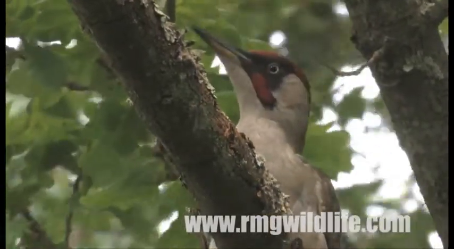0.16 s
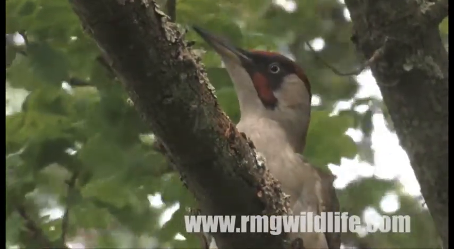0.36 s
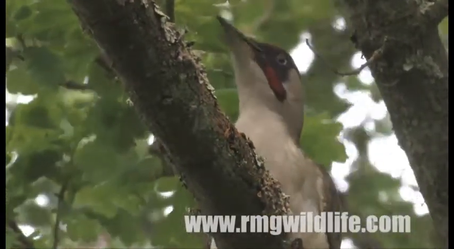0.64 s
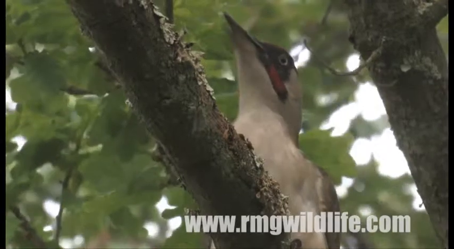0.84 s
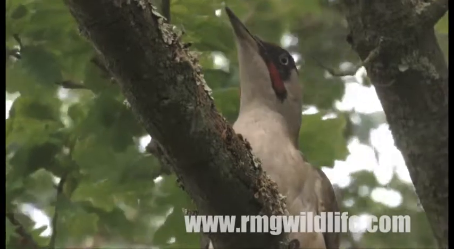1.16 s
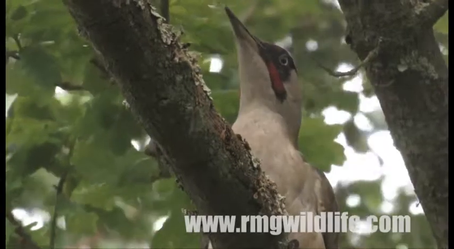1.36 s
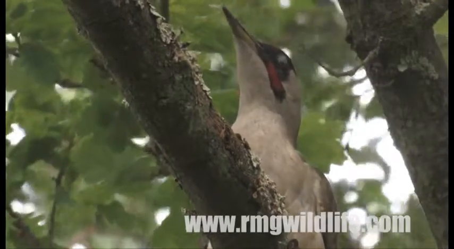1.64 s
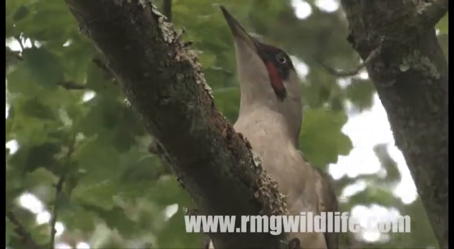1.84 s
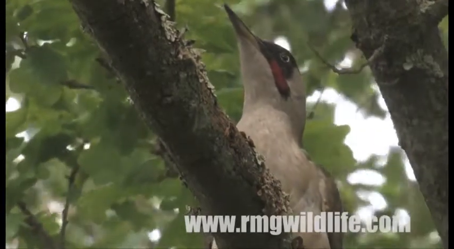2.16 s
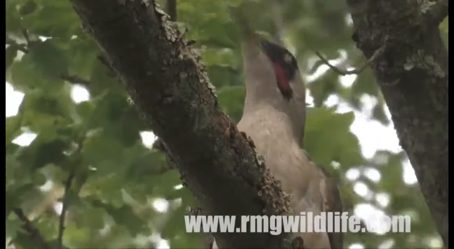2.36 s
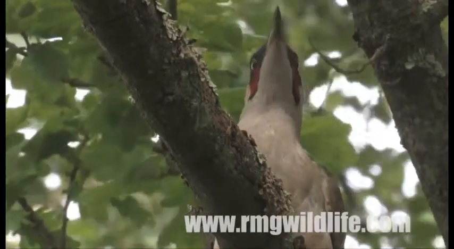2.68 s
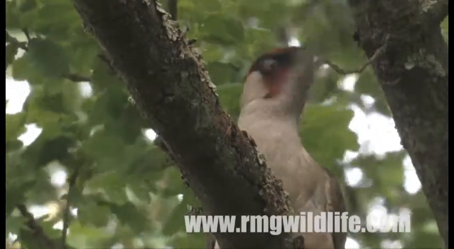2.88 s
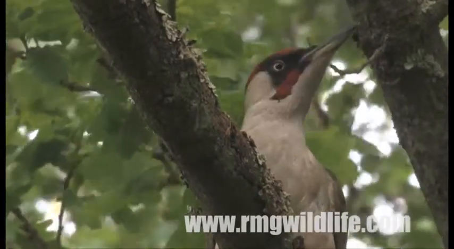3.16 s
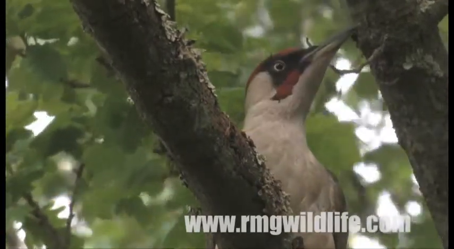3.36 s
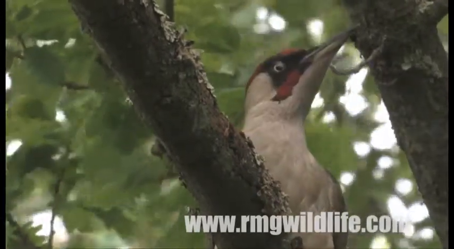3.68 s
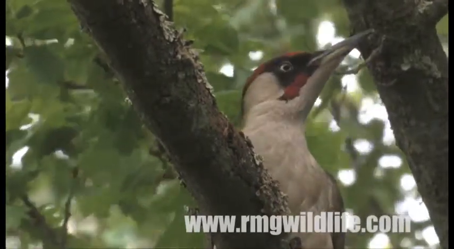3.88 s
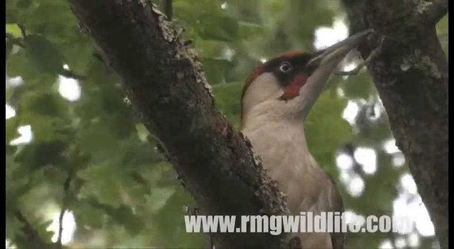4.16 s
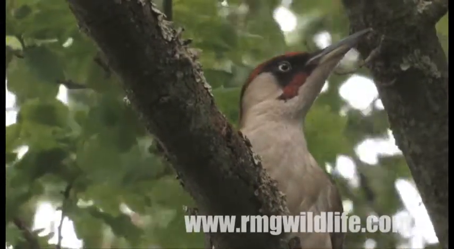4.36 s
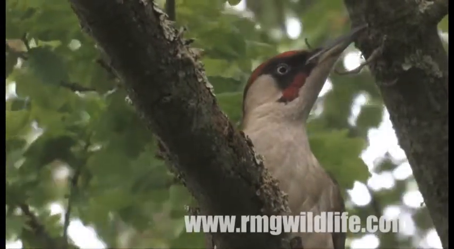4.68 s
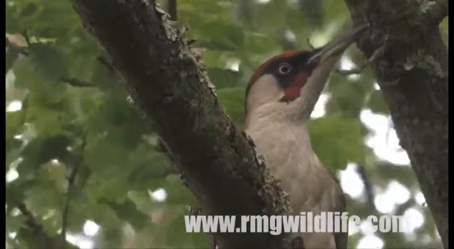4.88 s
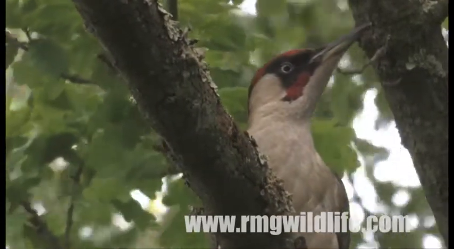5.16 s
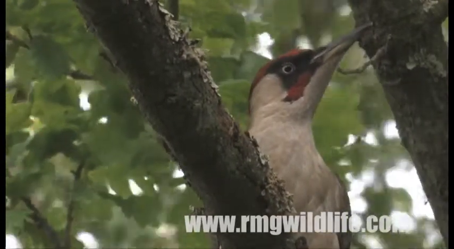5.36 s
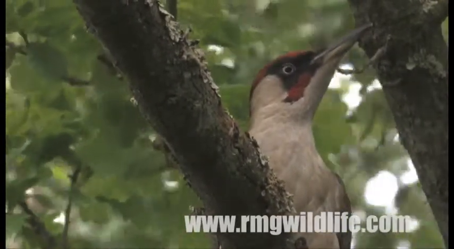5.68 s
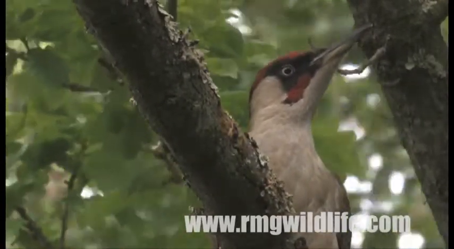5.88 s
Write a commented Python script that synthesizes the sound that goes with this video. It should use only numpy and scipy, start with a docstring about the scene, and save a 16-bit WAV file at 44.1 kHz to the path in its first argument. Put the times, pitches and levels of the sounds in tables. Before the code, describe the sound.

A low, steady woodland hush runs throughout, with very faint high leaf rustle that strengthens a little after 4 seconds. A woodpecker, fairly close and central, gives ten very short, sharp calls, about a tenth of a second or less each, arching up and dropping at the end, with a brief woody echo. A clear yelp comes at 0.15, then three harsh, hoarse squawks at 0.6, 0.75 and 0.9, and clear cracking yelps at 1.2 and 2.0. Far away, a small bird whistles thinly at 2.3, runs a rapid faint trill from 2.4 to 2.9, and adds a rising peep at 3.0. Another yelp follows at 3.3. Soft dull bumps with a light tick sound near the microphone at 3.65. Reedy, nasal calls come at 3.95 and 4.4, with a faint low thump at 4.2 between them. After a pause, a last, softer reedy call sounds at 5.85, then small bumps at 5.97.

```python
"""A green woodpecker on a branch gives ten short, sharp calls, clear, harsh or reedy, as stacks of harmonics.
Each is an arch of pitch that drops at its end; trunks and leaves throw it back as decaying scatter.
A small bird twitters far off in gliding sine tones, and leaves stir over a low steady hush, both of shaped noise.
Close to the microphone come a few soft bumps: damped sines, with one tick of noise."""
import sys
import numpy as np
from scipy import signal
from scipy.fft import rfft, irfft
from scipy.io import wavfile
from scipy.ndimage import uniform_filter1d

SR = 44100
rng = np.random.default_rng(int(sys.argv[2]) if len(sys.argv) > 2 else 0)


def bounce(signal):
    """Save signal as a 16-bit WAV file at the path given by the first command-line argument."""
    frames = np.transpose(np.atleast_2d(signal))
    limited = np.clip(frames, -1, 1)
    pcm = np.round(limited * 32767).astype(np.int16)
    wavfile.write(sys.argv[1], SR, pcm)


N = 266011

# steady hush of the place, shape only: (frequency [Hz], relative density [dB per Hz])
HUSH_SPECTRUM = [(15, -56), (25, 3), (59, -9), (119, -7), (152, -3.5), (305, -3.5), (469, -3), (509, -5.5),
                 (648, -9), (703, -8.5), (895, -11.5), (1750, -18.5), (2230, -20), (3260, -23),
                 (15500, -28)]
# stirring leaves, shape only: (frequency [Hz], relative density [dB per Hz])
LEAF_SPECTRUM = [(2000, -14), (4000, -10.5), (6500, -5.5), (8000, -9), (10000, -19), (15000, -35)]
# leaves as the breeze moves them: (time [s], level [dB])
LEAF_LEVEL = [(0, -77.5), (1.6, -78.5), (2.6, -76.5), (3.6, -76), (4.6, -73), (5.1, -72.5), (5.6, -72),
              (6.03, -73)]
# likeness of left and right in the hush and leaves: (frequency [Hz], correlation [-1 to 1])
STEREO_LIKENESS = [(60, 0.95), (150, 0.98), (380, 0.99), (950, 0.98), (2380, 0.96), (5980, 0.83),
                   (15000, 0.36)]
# the woodpecker's throat and open beak: (frequency [Hz], gain [dB])
THROAT = [(600, -5), (1200, -10.5), (1700, 2.5), (2300, 1.5), (2900, -1.2), (3600, -2), (4400, -0.5),
          (5200, -2), (6300, -1), (7500, -16.5), (9000, -18), (11000, -26), (14000, -40)]
# clear calls that crack: (top of the arch [s], climb [s], hold until the crack [s], drop [s], top pitch [Hz],
#   arch width [s], pitch after the crack [Hz], scoop level [dB], level [dB], late swell [dB],
#   level after the crack [dB], overtones [dB], undertone [dB], straight treble [dB], echo [dB],
#   beak resonance [dB], creak [radians]); call levels here and below are before throat and woodpecker gain
YELPS = [(0.162, .0145, 0.04, .028, 2660, 0.024, 2550, -59.5, -35.5, 1, -44.5, 2.5, -41, -3, 1.5, 4, 0.031),
         (1.177, .009, .0315, 0.026, 2174, 0.039, 2595, -58.5, -41, 6.5, -44, 3.5, -19.5, -5, 1, -2, 0.14),
         (1.976, 0.011, .027, 0.024, 2152, 0.033, 2424, -55, -43.5, 6, -44.5, 2.5, -22, -5, 1.5, -4.5, 0.45),
         (3.268, 0.0095, 0.026, 0.02, 2283, 0.024, 2350, -52.5, -43, 6, -47.5, 1, -17, -5.5, 1.5, 3, 0.18)]
# harsh calls: (top of the arch [s], rise [s], fall [s], top pitch [Hz], level [dB], burst before the top [s],
#   burst [dB], pitch jump as the burst breaks [share], roughness [0-1], straight treble [dB], echo [dB],
#   beak resonance [dB], creak [radians])
SQUAWKS = [(0.597, 0.042, 0.036, 3004, -50.5, 0.02, 18, 0.016, .42, -7, 3.1, 7.5, 0.056),
           (0.735, 0.036, 0.034, 3004, -49, 0.019, 14.5, .17, 0.49, -6, 4.2, 9.7, .027),
           (0.916, .030, 0.027, 2881, -49, 0.0136, 14.9, 0.0615, 0.62, -6.5, 4.1, 10.6, 0.075)]
# reedy, period-doubled calls: (top of the arch [s], climb [s], hold [s], drop [s], top pitch [Hz], level [dB],
#   fade while held [dB], overtones [dB], undertone [dB], late undertone [dB], late roughness [0-1],
#   straight treble [dB], echo [dB], beak resonance [dB], creak [radians])
CHUCKS = [(3.961, .013, 0.035, 0.023, 3278, -41.5, 8.5, -2, -3, 15.5, 0.33, -4, 1, -2.5, .03),
          (4.388, 0.013, 0.038, .015, 3220, -40.5, 9.5, -1.5, -2.5, 5.5, 0.15, -2.5, 1.5, -1, .03),
          (5.860, .010, .020, 0.011, 3020, -46, 3.5, -1, -1, 2.5, 0.1, -5.5, 1.5, -2, 0.058)]
# reverberation of the trees beyond: (frequency [Hz], 60 dB decay time [s])
WOOD_T60 = [(500, 0.48), (2000, 0.64), (4500, 0.61), (8000, 0.48), (14000, 0.2)]
# colour of their echo: (frequency [Hz], gain [dB])
WOOD_COLOUR = [(1000, 2.5), (2200, -1.5), (3200, -5), (4400, -1.5), (6500, -1), (10000, 4)]
# the far bird's thin whistles: (time [s], length [s], first pitch [Hz], last pitch [Hz], level [dB])
WHISTLES = [(2.29, 0.15, 4820, 4800, -79), (3.017, 0.054, 4030, 5440, -73)]
# soft bumps near the microphone: (time [s], pitch [Hz], length [s], level [dB])
BUMPS = [(3.643, 283, 0.011, -47), (3.648, 139, 0.017, -52), (3.665, 268, 0.011, -50),
         (3.672, 133, 0.022, -51), (4.205, 125, 0.099, -59.5), (5.965, 171, 0.017, -57),
         (5.983, 173, 0.0062, -44), (5.987, 99, 0.029, -50)]

HUSH_DB = -64
EDGE_HZ = 15750  # upper band limit

# the rough slide up into a clear or reedy call: length, share of the pitch, undertone, overtone change
SCOOP_S, SCOOP_SHARE, SCOOP_UNDER_DB, SCOOP_OVER_DB = .011, .37, -3, -5
SCOOP_ROUGH, HOLD_ROUGH = 0.74, .06  # roughness added in the scoop, and of the held tone
GRIP_S, CRACK_S = 0.00093, 0.00062  # how fast the tone takes hold, and how fast it cracks
ARCH_SAG, HOLD_FADE_DB_PER_S = .27, 130  # the arch can sink by this share of its top pitch
SWELL_AT_S, SWELL_S = 0.022, 0.011  # a clear call swells once more after its top
DULL_DB_PER_S, DULLEST_DB = 548, -15.5  # overtones fade as the call goes on
# the fall after the crack
DROP_END_HZ, DROP_BEND, DROP_FADE_DB, DROP_UNDER_DB, DROP_ROUGH = 1226, 1.6, 17, 8, 0.48

# shares of the top pitch gained and lost, and how fast it sinks
SQUAWK_CLIMB, SQUAWK_SAG, SQUAWK_SAG_S = .45, .45, .021
SQUAWK_ATTACK_DB, SQUAWK_FADE_DB = 14.5, 0.5
SQUAWK_OVER_DB, SQUAWK_DULL_DB, SQUAWK_UNDER_DB, SQUAWK_UNDER_FADE_DB = -5, 16, 6, 16
BURST_S, BURST_ROUGH, JUMP_S = .011, 0.2, 0.016

# the far trill: evenly spaced chips, each with a flick after it that grows through the trill
TRILL_S, CHIP_GAP_S, FLICK_S = 2.395, .0607, 0.032
TRILL_DB, TRILL_ENDS_DB, FLICK_DB, FLICK_GROWTH_DB = -68.5, -1, -72, 10

TICK_S, TICK_DB = 3.645, -64  # a light tick with the first bump

# the pitch of a reedy call steps down by this share onto a shelf; level of its scoop
CHUCK_SHELF, CHUCK_SHELF_S, CHUCK_SCOOP_DB = .245, .018, -52
# the voice breaks up as it falls off the shelf
CHUCK_DROP_SHARE, CHUCK_DROP_DB, CHUCK_DROP_ROUGH = .46, 5.5, 0.37


def gain_of(db):
    """Decibels to amplitude."""
    return 10 ** (np.asarray(db) / 20)


def evened(x):
    """Scales to rms 1."""
    return x / np.sqrt(np.mean(x ** 2) + 1e-20)


def read(points, hz):
    """Reads a spectrum on a log-frequency axis."""
    f, value = np.transpose(points)
    return np.interp(np.log(hz + 1), np.log(f + 1), value)


def add(mix, s, sound):
    """Adds a sound into the mix at time s."""
    part = mix[round(s * SR):][:len(sound)]
    part += sound[:len(part)]


def colour(x, points):
    """Filters by a spectrum of (frequency [Hz], gain [dB]) points."""
    gain = gain_of(read(points, np.fft.rfftfreq(len(x), 1 / SR)))
    return irfft(rfft(x) * gain, len(x))


def wobble(size, hz):
    """Random motion of rms 1, mostly slower than hz."""
    f = np.fft.rfftfreq(size, 1 / SR)
    spectrum = rfft(rng.standard_normal(size)) / (1 + (f / hz) ** 4)
    return evened(irfft(spectrum, size))


def step(t, width_s):
    """Goes smoothly from 0 to 1 as t passes zero."""
    return (1 + np.tanh(t / width_s / 2)) / 2


def air(spectrum, patchy_db):
    """Stereo noise of a given spectrum, with patches of level that drift in time and frequency."""
    hz = np.fft.rfftfreq(2048, 1 / SR)
    frames = N // 512 + 5
    a, b, c, d, patches = rng.standard_normal((5, len(hz), frames))
    patches = uniform_filter1d(patches, size=14, axis=0)
    patches = evened(uniform_filter1d(patches, size=10, axis=1))
    same = np.clip(read(STEREO_LIKENESS, hz), -1, 1)[:, None]
    left = a + 1j * b
    right = same * left + np.sqrt(1 - same ** 2) * (c + 1j * d)
    bins = np.array([left, right]) * gain_of(read(spectrum, hz)[:, None] + patchy_db * patches)
    return evened(signal.istft(bins, nperseg=2048, noverlap=1536)[1][:, :N])


def hush():
    """The low, steady hush of the place: noise weighted to the lowest frequencies."""
    return gain_of(HUSH_DB) * air(HUSH_SPECTRUM, patchy_db=-0.08)


def leaves():
    """Leaves stirring: patchy high noise whose level follows the breeze."""
    breeze_db = np.interp(np.arange(N) / SR, *np.transpose(LEAF_LEVEL))
    return gain_of(breeze_db) * air(LEAF_SPECTRUM, patchy_db=1.7)


def woodpecker(level_db=2, scatter_share=0.32, spread_db=-22):
    """With the head turned away, the treble goes into the trees rather than straight to the microphone."""
    straight, scattered = np.zeros(N), np.zeros(N)
    for gesture, table in [(yelp, YELPS), (squawk, SQUAWKS), (chuck, CHUCKS)]:
        for *shape, treble_db, echo_db, beak_db, creak in table:
            s, voice = call(gesture(*shape), creak)
            voice = colour(voice, [(4800, 0.0054), (6100, beak_db), (7000, beak_db / 2), (9000, 0)])
            add(straight, s, colour(voice, [(3000, 0), (4500, treble_db)]))
            to_trees = colour(voice, [(3000, 0.0081), (4500, -scatter_share * treble_db)])
            add(scattered, s, gain_of(echo_db) * to_trees)
    middle = straight + wood(scattered)
    side = gain_of(spread_db) * wood(scattered)  # a little of the echo differs between left and right
    return gain_of(level_db) * np.array([middle + side, middle - side])


def call(rows, creak, jitter=0.099, shimmer=0.91, rasp_db=-7, creak_s=0.038, edge_db_per_s=700):
    """The syrinx sings a stack of harmonics; period doubling adds lines between, roughness unsteadies them."""
    s, *columns = np.transpose(rows)
    t = np.arange(s[0] - .025, s[-1] + .008, 1 / SR)
    hz, db, over_db, under_db, rough = (np.interp(t, s, c) for c in columns)
    # the level ramps up steeply before the call and down after it
    db = db - edge_db_per_s * abs(t - np.clip(t, s[0], s[-1]))
    rough = rough ** 2 / (abs(rough) + .15)  # low roughness shrinks most: a clear held tone stays clean
    unsteady_hz = hz * (1 + jitter * rough * wobble(len(t), 1040))
    phase = 2 * np.pi * np.cumsum(unsteady_hz) / SR
    # early in the call the timing sways once in three cycles: a creak, with lines between the harmonics
    opening = np.exp(-((t - s[0]) / creak_s) ** 4)
    phase = phase + creak * opening * np.sin(phase / 3)
    voice = np.zeros(len(t))
    for k in np.arange(1, 13) / 2:  # half-numbered lines are the undertone series
        line_db = read(THROAT, k * hz) + over_db * (k > 1) + under_db * (k % 1 > 0)
        flutter = 1 + shimmer * rough * wobble(len(t), 590)
        line = np.cos(k * phase + 2 * k ** 2)  # the throat spreads each pulse
        voice += gain_of(line_db) * flutter * line * (k * hz < SR / 2)
    # a rasp, in one puff a cycle, is heard before the tone takes hold
    breath = colour(rng.standard_normal(len(t)), THROAT)
    rasp = evened(colour(breath * (1 + np.cos(phase)), [(6500, -1.5), (9000, 2)]))
    tone = np.clip((t - s[0]) / .007 + .3, 0, 1)
    voice = tone * voice + (gain_of(rasp_db) * rough + (1 - tone) / 2) * rasp
    voice = gain_of(db) * voice * signal.windows.tukey(len(t), .1)
    return t[0], np.pad(voice, (0, 256))


def yelp(top_s, climb_s, hold_s, drop_s, top_hz, width_s, crack_hz, scoop_db, level_db, swell_db, crack_db,
         over_db, under_db):
    """A rough scoop up, a clean arch, then a crack to another pitch and a fall, as rows for call()."""
    t = np.linspace(-climb_s - SCOOP_S, hold_s + drop_s, 200)
    loose, cracked = step(-t - climb_s, GRIP_S), step(t - hold_s, CRACK_S)
    scoop = np.maximum(-t - climb_s, 0) / SCOOP_S
    after = np.maximum(t, 0)
    drop = np.maximum(t - hold_s, 0) / drop_s

    def crack(held, fallen):
        """Passes from the held voice to the falling one."""
        return (1 - cracked) * held + cracked * fallen

    arch_hz = top_hz * (1 - ARCH_SAG * (1 - np.exp(-(t / width_s) ** 2))) * (1 - SCOOP_SHARE * scoop)
    hz = crack(arch_hz, crack_hz + (DROP_END_HZ - crack_hz) * drop ** DROP_BEND)
    attack = np.minimum(t, 0) ** 2 / t[0] ** 2
    swell = swell_db * np.exp(-((t - SWELL_AT_S) / SWELL_S) ** 2)
    held_db = level_db + (scoop_db - level_db) * attack + swell - HOLD_FADE_DB_PER_S * after
    db = crack(held_db, crack_db - DROP_FADE_DB * drop)
    under = crack(under_db + (SCOOP_UNDER_DB - under_db) * loose, DROP_UNDER_DB)
    rough = crack(HOLD_ROUGH + SCOOP_ROUGH * loose, DROP_ROUGH)
    over = np.maximum(over_db + SCOOP_OVER_DB * loose - DULL_DB_PER_S * after - swell, DULLEST_DB)
    # (time [s], pitch [Hz], level [dB], overtones [dB], undertone [dB], roughness)
    return np.transpose([top_s + t, hz, db, over, under, rough])


def wood(x, near_db=-14, near_t60=0.19, far_db=-19.5, gap_s=0.0025):
    """Scatter from the nearest limbs dies fast; a faint long tail returns from the trees beyond."""
    taps = np.zeros(SR)
    at = np.arange(0, SR - 20, 20)
    taps[at + rng.integers(0, 20, len(at))] = rng.choice([-1., 1.], len(at))
    age = np.arange(SR) / SR
    near = taps * gain_of(-60 * age / near_t60) * np.clip(age / gap_s - 1, 0, 1)
    # the far tail uses the taps in reverse order, and each frequency dies at its own rate
    hz, t, bins = signal.stft(taps[::-1], SR, nperseg=256)
    bins = bins * gain_of(-60 * t / read(WOOD_T60, hz)[:, None])
    far = signal.istft(bins, SR, nperseg=256)[1][:SR]
    far = colour(far, WOOD_COLOUR) * np.clip(age / 0.025, 0, 1)
    echo = gain_of(near_db) * near / np.linalg.norm(near) + gain_of(far_db) * far / np.linalg.norm(far)
    return signal.fftconvolve(x, echo)[:N]


def squawk(top_s, rise_s, fall_s, top_hz, level_db, lead_s, burst_db, jump, rough):
    """A hoarse arch with a doubled period; on the way up one pure tone bursts out of it. Rows as in yelp()."""
    t = np.linspace(-rise_s, fall_s, 200)
    early, after = np.maximum(-t, 0) / rise_s, np.maximum(t, 0)
    late = after / fall_s
    broken = t + lead_s - BURST_S  # time since the burst breaks
    sag = 1 - np.exp(-(after / SQUAWK_SAG_S) ** 2)
    hz = top_hz * (1 - SQUAWK_CLIMB * early ** 2 - SQUAWK_SAG * sag)
    hz = hz * (1 + jump * step(broken, CRACK_S) * np.exp(-(broken / JUMP_S) ** 2))
    burst = np.exp(-((t + lead_s) / BURST_S) ** 4)
    db = level_db - SQUAWK_ATTACK_DB * early ** 4 - SQUAWK_FADE_DB * late + burst_db * burst
    over = SQUAWK_OVER_DB - SQUAWK_DULL_DB * late - burst_db * burst
    under = SQUAWK_UNDER_DB - SQUAWK_UNDER_FADE_DB * late ** 2 - burst_db * burst
    return np.transpose([top_s + t, hz, db, over, under, rough + (BURST_ROUGH - rough) * burst])


def far_bird(pitch_hz=4230, slide_hz=480, chip_s=0.026, echo_db=9, count=8):
    """Far off, quick falling chips and two thin whistles, all sine tones, blurred by the trees."""
    song = np.zeros(N)
    t = np.arange(0, chip_s, 1 / SR)
    turns = np.cumsum(pitch_hz + slide_hz * np.exp(-t / 0.0082)) / SR
    for k, along in enumerate(np.linspace(0, 1, count)):
        detune = 1 + .006 * rng.standard_normal((2, 1))
        chip, flick = np.sin(2 * np.pi * turns * detune) * np.hanning(len(t))
        s = TRILL_S + k * CHIP_GAP_S
        add(song, s, gain_of(TRILL_DB + TRILL_ENDS_DB * (2 * along - 1) ** 2) * chip)
        add(song, s + FLICK_S, gain_of(FLICK_DB - FLICK_GROWTH_DB * (1 - along)) * flick)
    for s, length, first_hz, last_hz, db in WHISTLES:
        hz = np.geomspace(first_hz, last_hz, round(length * SR))
        whistle = np.sin(2 * np.pi * np.cumsum(hz) / SR) * signal.windows.tukey(len(hz))
        add(song, s, gain_of(db) * whistle)
    return song + gain_of(echo_db) * wood(song)


def bumps(tick_s=0.0059):
    """Dull, heavily damped knocks near the microphone, one with a light tick of decaying noise."""
    out = np.zeros(N)
    for s, hz, length, db in BUMPS:
        t = np.arange(0, 2 * length, 1 / SR)
        u = 3 * t / length  # the envelope peaks at u = 1
        knock = u ** 2 * np.exp(2 - 2 * u) * np.sin(2 * np.pi * hz * t)
        add(out, s, gain_of(db) * knock)
    t = np.arange(2048) / SR
    tick = evened(colour(rng.standard_normal(len(t)), [(500, 1), (6000, 11), (12000, -18)]))
    add(out, TICK_S, gain_of(TICK_DB) * tick * np.exp(-t / tick_s))
    return out


def chuck(top_s, climb_s, hold_s, drop_s, top_hz, level_db, fade_db, over_db, under_db, late_under_db,
          late_rough):
    """A scoop and an arch that settles on a lower shelf, then falls off it. Rows as in yelp()."""
    t = np.linspace(-climb_s - SCOOP_S, hold_s + drop_s, 200)
    loose = step(-t - climb_s, GRIP_S)
    scoop = np.maximum(-t - climb_s, 0) / SCOOP_S
    late = np.clip(t / hold_s, 0, 1) ** 2
    drop = np.maximum(t - hold_s, 0) / drop_s
    shelf = 1 - np.exp(-abs(np.maximum(t, -climb_s) / CHUCK_SHELF_S) ** 3)
    hz = top_hz * (1 - CHUCK_SHELF * shelf) * (1 - SCOOP_SHARE * scoop) * (1 - CHUCK_DROP_SHARE * drop)
    attack = (np.minimum(t, 0) / t[0]) ** 2
    db = level_db + (CHUCK_SCOOP_DB - level_db) * attack - fade_db * late - CHUCK_DROP_DB * drop
    over = np.maximum(over_db - DULL_DB_PER_S * np.maximum(t, 0), DULLEST_DB)
    under = under_db + (late_under_db - under_db) * late * (1 - drop)
    rough = HOLD_ROUGH + SCOOP_ROUGH * loose + late_rough * late + CHUCK_DROP_ROUGH * np.sqrt(drop)
    return np.transpose([top_s + t, hz, db, over, under, rough])


def scene():
    """Birds and bumps in the middle, over the hush of the wood and its leaves."""
    return hush() + leaves() + woodpecker() + far_bird() + bumps()


def record(dry):
    """The right channel is 1 dB louder than the left; then a low-pass sets the band limit."""
    tilted = dry * gain_of([[-.5], [.5]])
    low_pass = signal.firwin(511, EDGE_HZ, window=("kaiser", 9), fs=SR)
    return signal.oaconvolve(tilted, low_pass[None], "same")


dry = scene()
out = record(dry)
bounce(out)
```